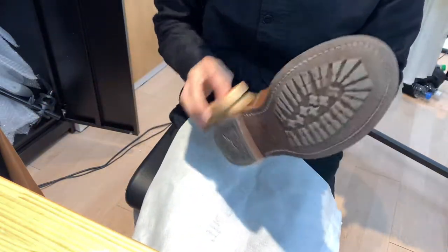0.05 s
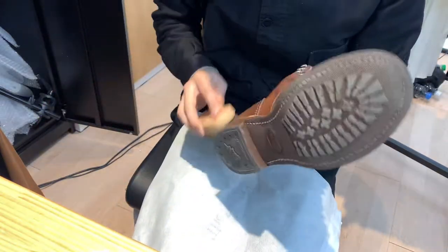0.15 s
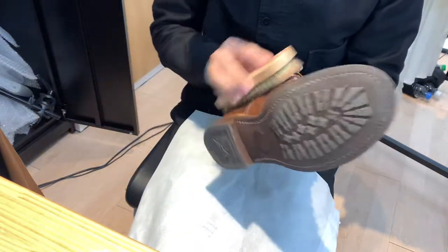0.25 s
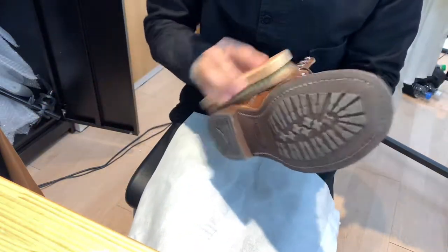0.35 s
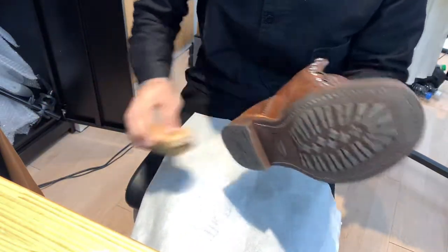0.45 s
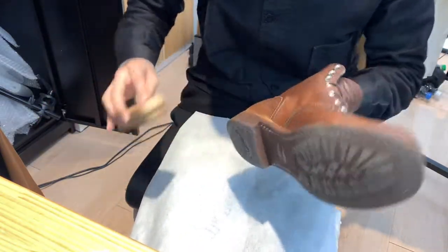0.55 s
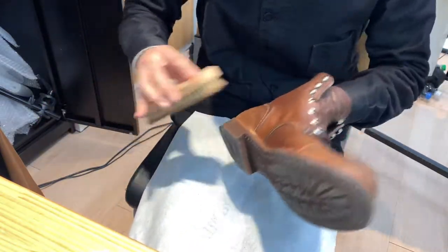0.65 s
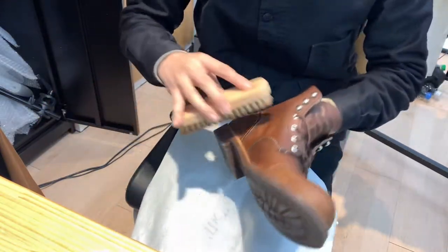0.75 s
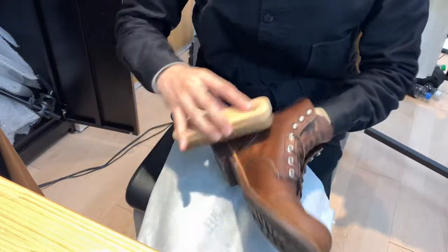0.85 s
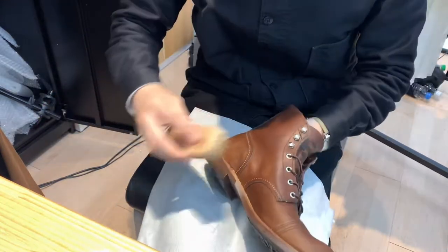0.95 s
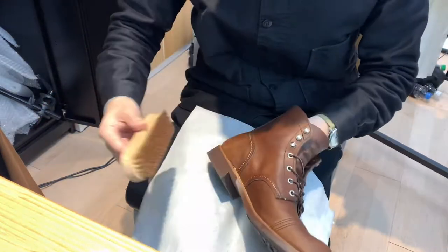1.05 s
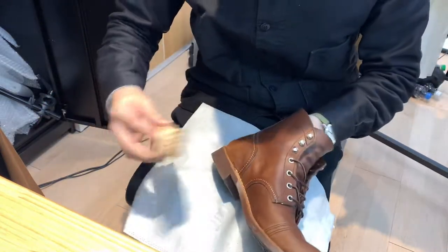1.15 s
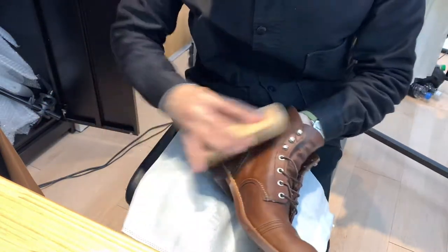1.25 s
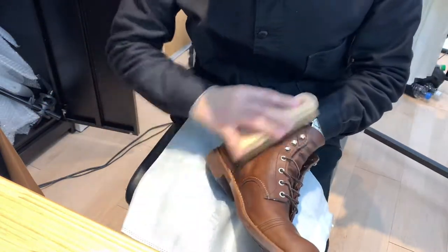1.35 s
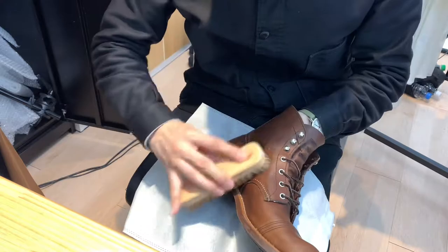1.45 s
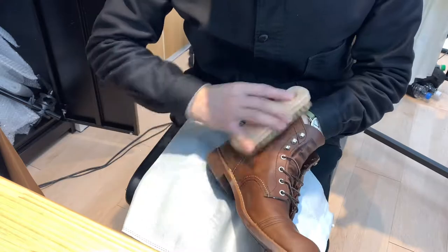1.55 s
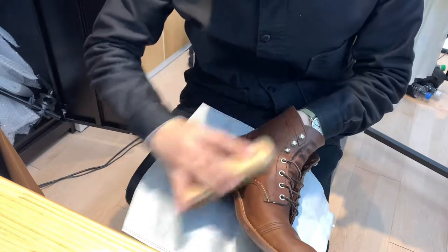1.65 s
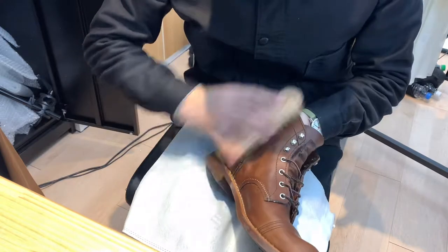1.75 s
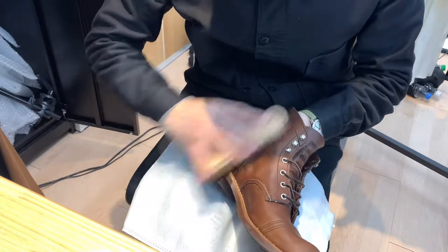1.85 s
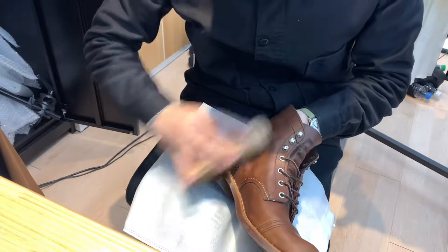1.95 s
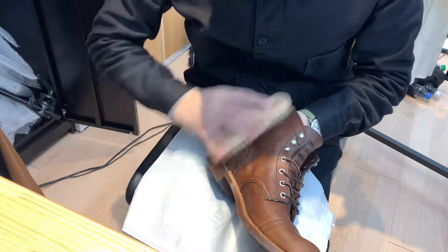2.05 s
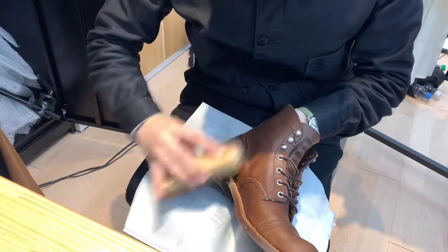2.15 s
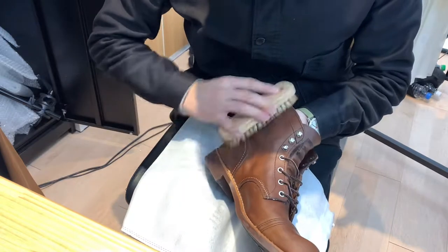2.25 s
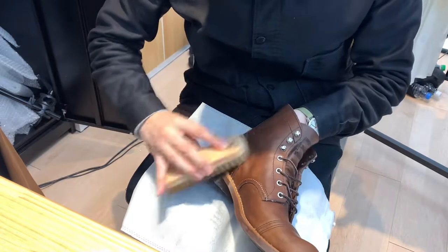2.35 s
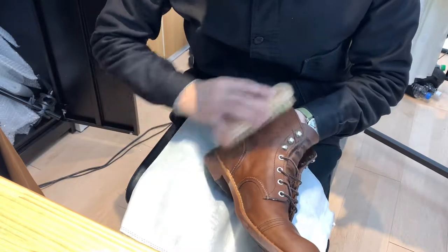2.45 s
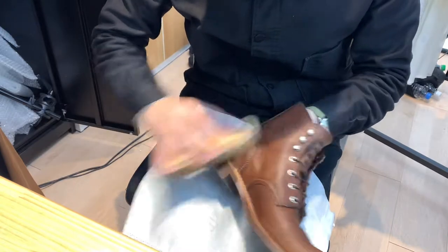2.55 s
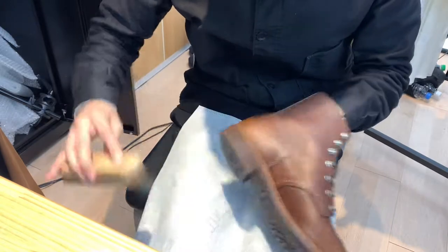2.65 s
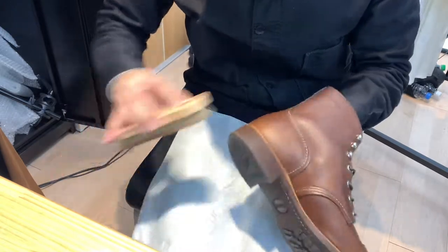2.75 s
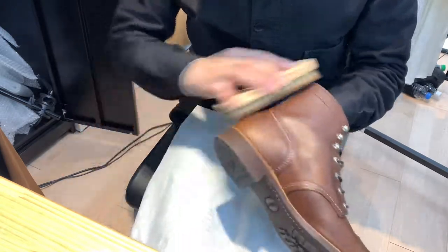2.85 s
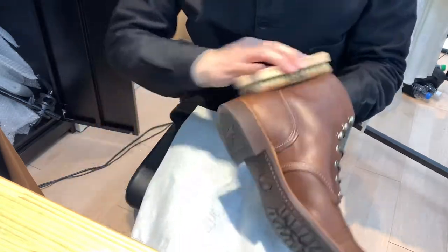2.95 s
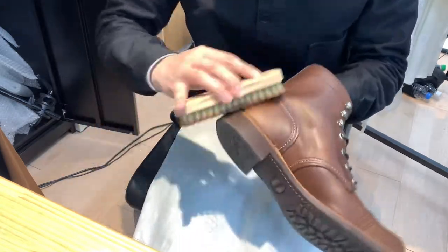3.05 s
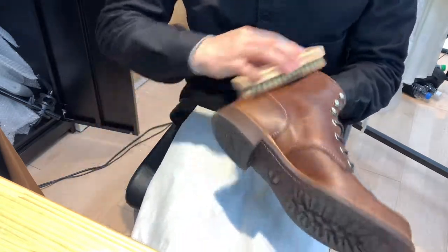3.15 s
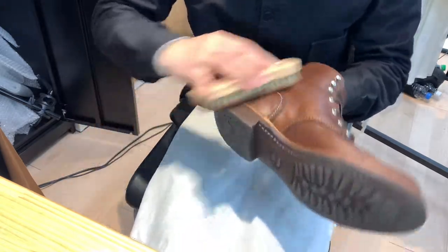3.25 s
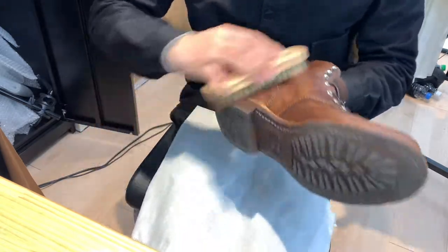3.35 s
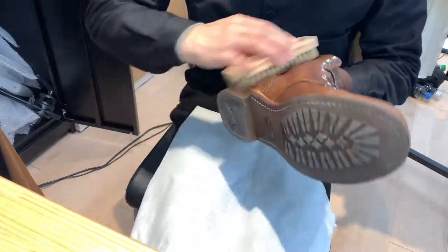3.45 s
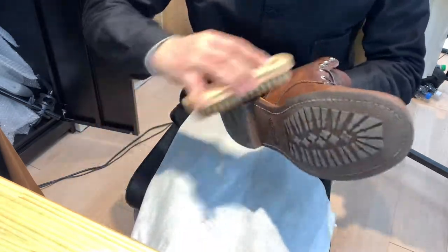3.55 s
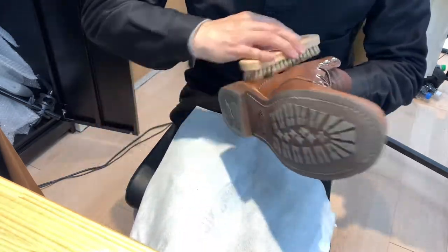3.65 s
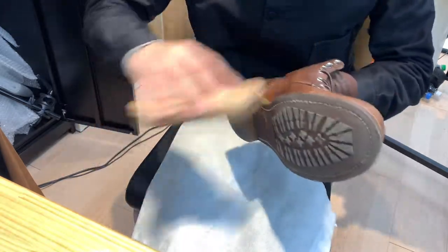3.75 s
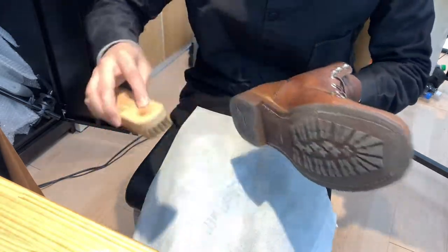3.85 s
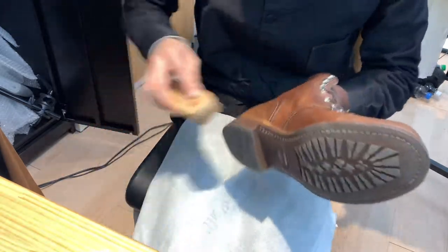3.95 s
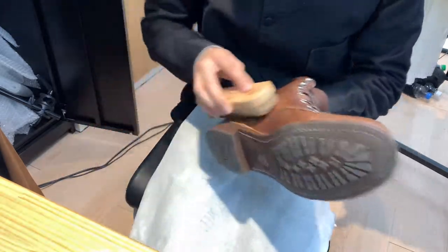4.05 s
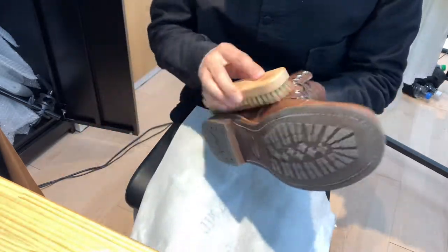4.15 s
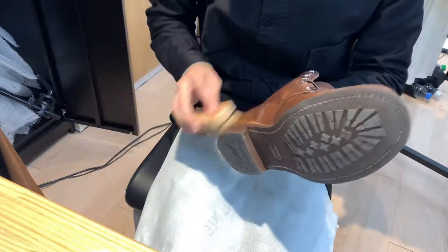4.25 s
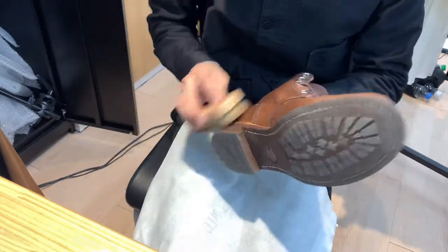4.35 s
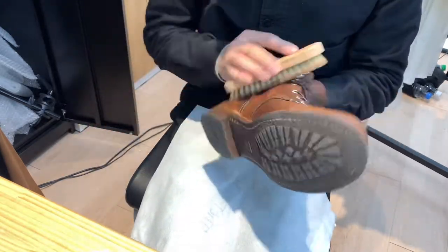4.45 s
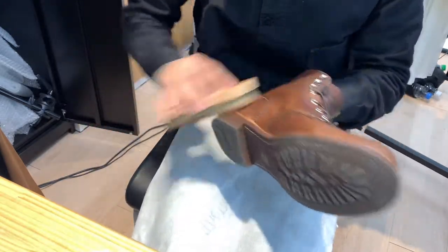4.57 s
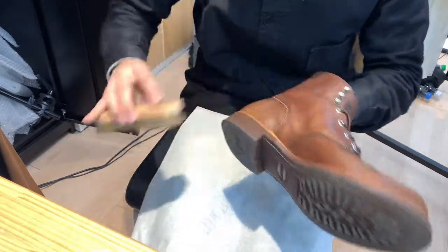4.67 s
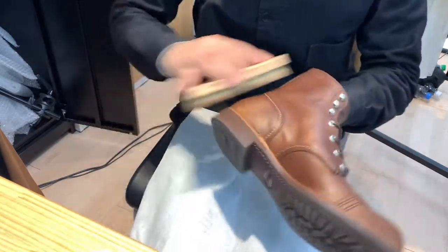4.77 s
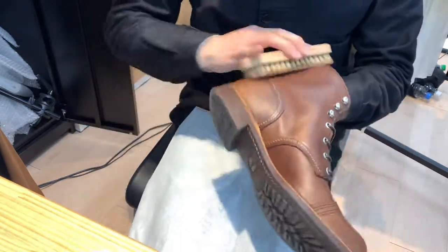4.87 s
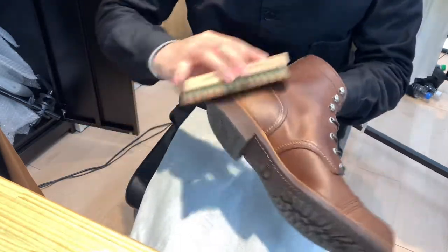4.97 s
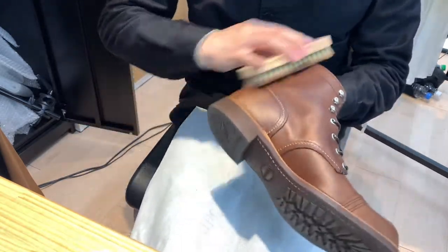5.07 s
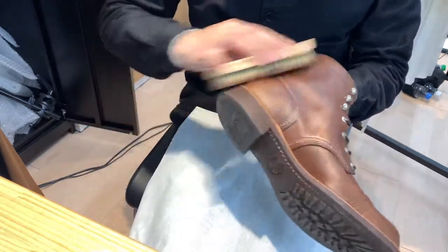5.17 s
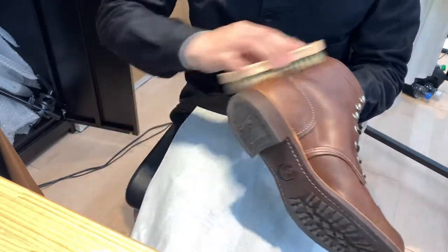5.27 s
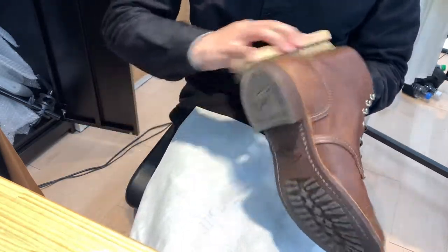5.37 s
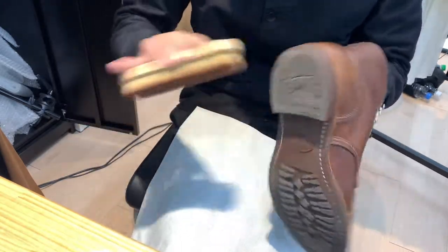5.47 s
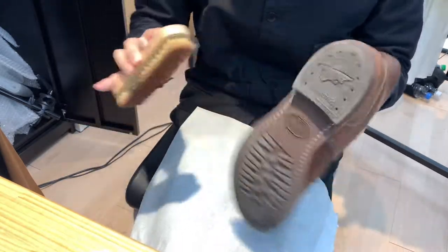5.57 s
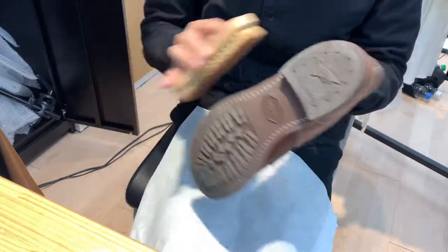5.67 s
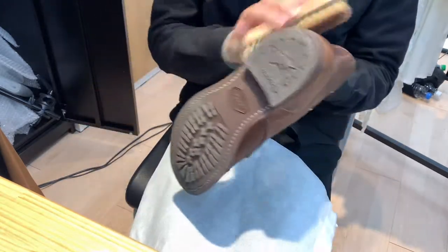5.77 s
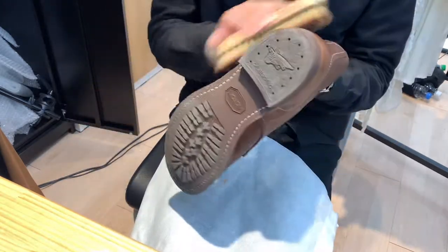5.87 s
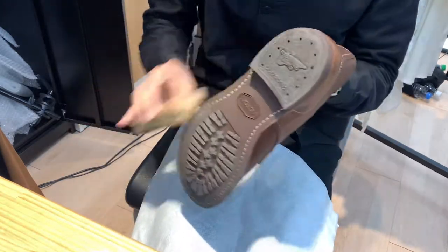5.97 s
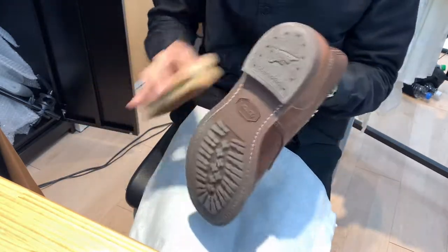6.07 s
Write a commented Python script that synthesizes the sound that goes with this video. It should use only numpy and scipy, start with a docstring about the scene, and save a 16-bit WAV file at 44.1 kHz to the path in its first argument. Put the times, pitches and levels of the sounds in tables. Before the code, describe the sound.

A bristle brush rasps quickly back and forth over a hollow leather boot in short runs, with soft thumps and pauses over a low ventilation hum.

```python
"""A wooden bristle brush sweeps quickly to and fro over a leather boot held on a lap, in runs with short pauses.
Random bristle flicks are coloured into hiss, rasp and drag; they also ring the hollow boot and the wooden block.
Bumps and sharp bites thump the boot with soft pulses, while short noise bursts slap, crunch and tick.
Clothes rustle in swells of random flicks as the boot is turned.
Behind, ventilation rushes as shaped noise and hums as unsteady sines in a small, dry room."""
import sys
import numpy as np
from scipy import signal
from scipy.fft import rfft, irfft, next_fast_len
from scipy.io import wavfile
from scipy.ndimage import map_coordinates

SR = 44100
rng = np.random.default_rng(int(sys.argv[2]) if len(sys.argv) > 2 else 0)


def wrap_up_sound(samples):
    """Save the sound to the file named by the first command line argument, as 16-bit audio."""
    columns = np.atleast_2d(samples).T
    # keep every value between -1 and 1, then stretch to whole-number steps
    tamed = np.clip(columns, -1, 1)
    steps = np.round(tamed * 32767).astype(np.int16)
    wavfile.write(sys.argv[1], SR, steps)


N = 269451
T = np.arange(N) / SR  # time in seconds

# The brush lands or turns back; each stroke lasts until the next turn or lift.
# Each row: start in seconds, hiss level in dB, pressure on the boot in dB.
STROKES = [(-.05, -44.5, -7.5), (0.116, -57.5, -10.5), (0.19, -48.5, 0.5), (0.288, -42, -2.5),
           (1.251, -50, 4.5), (1.325, -43, 3), (1.449, -44, 3.5), (1.554, -41.5, 2), (1.675, -42.5, 5.5),
           (1.78, -41, 4), (1.911, -43.5, 8.5), (2.009, -42, 3.5), (2.132, -43, 2.5), (2.239, -42.5, 0),
           (2.357, -42.5, 5.5), (2.461, -42, 2), (2.835, -53.5, -9), (2.901, -46, -6), (3.05, -45, -7),
           (3.165, -43.5, -3.5), (3.289, -42, 1), (3.403, -41.5, -2.5), (3.521, -42, 4), (3.621, -41, 3.5),
           (4.003, -47, -1), (4.117, -44, -6), (4.353, -45, 0), (4.44, -43, -4.5), (4.766, -47.5, -2),
           (4.837, -45.5, -7.5), (4.979, -48, -15.5), (5.089, -44, -2.5), (5.204, -44.5, -5),
           (5.298, -45.5, -7.5), (5.705, -53, -4.5), (5.819, -48.5, 2), (5.884, -43.5, -5),
           (6.083, -44.5, 5)]


def brushing():
    """Bristles bite first, shaking boot and block, then skim and hiss at full speed."""
    _, hiss_db, pressure_db = np.transpose(STROKES)
    speed = sweep(np.zeros(len(STROKES)), fastest=.46, power=1.0)
    rate = 2500 + 14000 * speed  # faster travel frees more bristles (flicks a second)
    tufts = amp(0.84 * wobble(70) + 0.23 * wobble(400))  # tufts catch and let go together
    on_leather = bristle_hiss(rate, hiss_db) + bristle_rasp(rate, hiss_db)
    on_leather = on_leather + block_ring(rate, hiss_db) + leather_drag(rate, hiss_db, pressure_db)
    # the boot's second field is weaker, so the drumming sits closer to the centre
    return tufts * on_leather + boot_drumming(rate, pressure_db) * amp([[0], [-3]])


# Bright spectrum of skimming bristles. Each row: frequency in Hz, density in dB per Hz.
HISS = [(2500, -15), (4500, -5.5), (6300, -5), (7800, 1), (10200, 1.5), (11500, 1.5), (13300, -0.5),
        (14500, -1), (15700, -11)]


def bristle_hiss(rate, hiss_db):
    """Bristles skim the leather: dense flicks with a bright colour, loudest at full speed."""
    texture = patchy(coloured(flicks(rate), HISS), depth_db=0.55, width_hz=630, seconds=0.067)
    return texture * sweep(hiss_db, fastest=0.44, power=1.27)


# Mid-heavy spectrum of biting bristles. Each row: frequency in Hz, density in dB per Hz.
RASP = [(700, -51), (1300, -6.5), (1900, -4), (3200, 4), (4500, -2.5), (6000, -6), (9000, -6.5)]


def bristle_rasp(rate, hiss_db):
    """Gripped bristles snap free: sparser flicks, louder where the leather grips."""
    texture = patchy(coloured(flicks(rate * .3), RASP), depth_db=3.0, width_hz=378, seconds=0.055)
    return texture * sweep(hiss_db, fastest=0.35, power=1.3) * amp(grip(T) - 2.5)


# Resonances of the wooden brush block. Each row: centre in Hz, width in Hz, level in dB.
BLOCK = [(1865, 400, -6.5), (2234, 99, 5.5), (2810, 320, -25)]
BLOCK_DB, BLOCK_PER_HISS = -43, 0.29  # the block rings almost alike in every stroke (dB, dB per dB)


def block_ring(rate, hiss_db):
    """Bristle flicks ring the wooden block, mostly early in each stroke."""
    ring = unit(rung(flicks(rate * .2), BLOCK)) * amp(2.5 * wobble(14))
    return ring * sweep(BLOCK_DB + BLOCK_PER_HISS * hiss_db, fastest=0.25, power=0.93)


# Dull spectrum of bristles dragging on leather. Each row: frequency in Hz, density in dB per Hz.
DRAG = [(200, -45), (420, 0), (700, 1), (1050, -3.5), (1500, -5), (2300, -3.5), (5000, -22.5)]
# offset in dB, then growth with pressure and with rasp in dB per dB
DRAG_DB, DRAG_PER_PRESSURE, DRAG_PER_RASP = -26, 0.32, 0.57


def leather_drag(rate, hiss_db, pressure_db):
    """Pressed bristles drag the leather: dull flicks that grow with pressure and rasp."""
    texture = patchy(coloured(flicks(rate * .12), DRAG), depth_db=3.0, width_hz=242, seconds=.05)
    level_db = DRAG_PER_PRESSURE * pressure_db + DRAG_PER_RASP * hiss_db
    return texture * sweep(level_db, fastest=0.27, power=0.83) * amp(DRAG_DB + DRAG_PER_RASP * grip(T))


# Resonances of the hollow boot. Each row: centre in Hz, width in Hz, level in dB.
BOOT = [(140, 12, -6), (167, 18, -7), (246.5, 28.4, 0.5), (287.5, 22.4, -6.5), (323, 50, -11.5),
        (423, 42, -10), (620, 94, -9), (795, 120, -6)]
BOOT_DB = -41.5  # drumming of the boot at pressure 0 dB


def boot_drumming(rate, pressure_db):
    """Bristle pushes drum the boot; soft leather passes only slow ones to the air inside."""
    soft_leather = [(60, -34), (200, 5.5), (450, -3.5), (1200, -29), (4000, -46)]  # (Hz, dB)
    pushes = coloured(flicks(rate * .1), soft_leather)
    drumming = patchy(rung(pushes, BOOT), depth_db=2.0, width_hz=210, seconds=0.056)
    return drumming * sweep(BOOT_DB + pressure_db, fastest=0.33, power=1.4)


# How the leather under the brush grips the bristles. Each row: time in seconds, rasp over hiss in dB.
GRIP = [(0, -7), (.4, -8.5), (1.28, 3), (1.8, 0), (2.5, -5), (3.1, 0.5), (3.22, -9), (4.4, -3), (4.55, -16),
        (4.85, -7), (5.04, 7), (5.14, -5), (5.25, 1), (5.37, -9), (5.75, -7.5)]


def grip(s):
    """Grip of the leather in dB at the times s."""
    return np.interp(s, *np.transpose(GRIP))


# The brush leaves the leather. Each entry: time in seconds.
LIFTS = [0.433, 2.583, 3.761, 4.27, 4.6, 5.426, 5.964, 6.17]
TRAIL_S = .007  # bent bristles trail on after each turn or lift
LIFT_LATE = 0.046  # it leaves at speed, so the last stroke peaks later (share of the stroke)


def sweep(levels_db, fastest, power):
    """One swell for each stroke, from its start to the next turn or lift."""
    starts = np.transpose(STROKES)[0]
    stops = np.concatenate([starts, LIFTS])
    out = np.zeros(N)
    for start, db in zip(starts, levels_db):
        stop = stops[stops > start].min()
        peak = fastest + LIFT_LATE * (stop in LIFTS)
        out += amp(db) * swell(start, stop + TRAIL_S, peak, power)
    return out


def swell(start, end, fastest, power):
    """A movement speeds up from rest and stops again; fastest is its peak, 0-1 of the way."""
    travel = np.clip((T - start) / (end - start), 0, 1)
    on = (travel > 0) & (travel < 1)
    skew = np.log(.5) / np.log(np.clip(fastest, .1, .9))  # moves the middle of the sine arch
    out = np.zeros(N)
    out[on] = np.sin(np.pi * travel[on] ** skew) ** power
    return out


def flicks(rate):
    """Bristles snapping free: random impulses, rate a second, of mean power 1."""
    chance = np.clip(rate / SR, 1e-4, 1)
    return noise() * (rng.random((2, N)) < chance) / np.sqrt(chance)


def patchy(x, depth_db, width_hz, seconds):
    """The colour shifts at random, as bristles cross seams, folds and curves; rms 1."""
    z = signal.stft(x, nperseg=256)[2]
    bins, frames = np.indices(z.shape[1:])
    across = bins * SR / 256 / max(width_hz, 100)
    along_time = frames * 128 / SR / max(seconds, .01)
    field = map_coordinates(rng.standard_normal((256, 640)), [across, along_time])
    return unit(signal.istft(z * amp(depth_db * field), nperseg=256)[1][:, :N])


# The bristle tips just touch the boot. Each row: start in seconds, end in seconds, hiss level in dB.
GRAZES = [(0.132, 0.19, -49.5), (1.012, 1.108, -66), (3.972, 4.028, -57), (4.303, 4.351, -46)]


def grazes():
    """The bristle tips alone swish, too lightly to shake the boot."""
    touch = sum(amp(db) * swell(start, end, fastest=0.38, power=1.6) for start, end, db in GRAZES)
    return touch * (coloured(flicks(9000), HISS) + amp(-11) * coloured(flicks(4100), RASP))


# wooden tick; soft, grippy leather muffles it (dB, dB per dB, dB per dB)
TICK_DB, TICK_PER_SLAP, TICK_PER_GRIP = -19.5, 0.85, 1.4
# Bumps of brush or hand on the boot, and sharp bites as the bristles start to drag.
# Each row: time in seconds, thump strength in dB before a common lift, leather slap level in dB.
KNOCKS = [(.226, -37.5, -42), (.926, -36, -54.5), (1.258, -20, -35.5), (1.458, -60, -37),
          (1.683, -53, -37.5), (1.794, -37.5, -45), (1.93, -28, -36), (2.155, -31, -39.5),
          (2.188, -34.5, -64), (2.261, -32.5, -47), (2.843, -39, -45), (3.546, -37, -48), (3.658, -43, -68),
          (4.362, -43, -61), (4.388, -41, -48), (4.401, -39, -50), (4.778, -39.5, -46.5), (5.228, -45, -38),
          (5.24, -37.5, -52), (5.43, -46.5, -76), (5.65, -44, -74), (5.719, -33, -39.5), (5.833, -37, -53),
          (5.914, -42, -47), (6.09, -37, -51.5)]


def knocks():
    """A soft push thumps the boot; bristles crunch, the leather slaps and the block ticks."""
    t = np.arange(SR // 4) / SR
    out = np.zeros((2, N + SR))
    for s, db, slap_db in KNOCKS:
        # a harder blow sinks in for longer and damps the boot more
        u = (t - .0055) / (0.00085 + 0.00026 * amp(db))
        push = (1 - u * u) * np.exp(-u * u / 2)
        thump = rung(push, BOOT, damping=0.85 + 8 * amp(db))
        # -60 * t / d fades by 60 dB in d seconds
        slap = coloured(noise(len(t)), DRAG) * amp(-60 * t / 0.082) * (1 - np.exp(-t / 0.00028))
        crunch = coloured(noise(len(t)), RASP) * amp(-27 - 60 * t / 0.024)
        tick_db = TICK_DB + TICK_PER_SLAP * slap_db - TICK_PER_GRIP * grip(s)
        tick = unit(rung(noise(len(t)), BLOCK)) * amp(tick_db - 60 * t / 0.13)
        first = round(s * SR)
        out[:, first:first + len(t)] += amp(slap_db) * (slap + crunch) + tick
        # the thump is centred
        out[0, first:first + len(t)] += amp(db + 5.5) * thump / np.abs(thump).max()
    return out[:, :N]


def early_echoes(x):
    """Each knock comes back from two nearby surfaces: two faint early echoes."""
    echoes = [(.0118, -17.5), (.0245, -18)]  # (delay s, dB)
    return filtered(x, lambda hz: 1 + sum(amp(db) * np.exp(-2j * np.pi * hz * delay)
                                          for delay, db in echoes))


# Spectrum of rubbing cloth. Each row: frequency in Hz, density in dB per Hz.
CLOTH = [(150, 6), (300, 22), (900, 1), (2800, -2.5), (5000, -10.5), (10000, -15), (15000, -23)]
# The boot is turned on the cloth. Each row: start in seconds, end in seconds, rustle level in dB.
HANDLING = [(.78, 1.23, -56.5), (5.42, 5.82, -61.5)]


def rustle():
    """Sleeve and lap cloth slide as the boot is turned: uneven swells of random flicks."""
    slide = sum(amp(db) * swell(start, end, fastest=0.48, power=0.92) for start, end, db in HANDLING)
    return slide * amp(2.24 * wobble(40)) * coloured(flicks(5000), CLOTH)


# Spectrum of the air rush. Each row: frequency in Hz, density in dB per Hz.
AIR = [(18, -34), (32, -12), (55, 2), (150, -4.5), (260, -4.5), (420, -13), (560, -12), (900, -18.5),
       (1500, -27.5), (2300, -29.5), (3500, -42.5), (5200, -45), (6500, -38), (15000, -49)]
# Motor tones. Each row: frequency in Hz, mean level in dB rms.
HUM = [(59, -67), (118.4, -58), (183, -63.5), (237, -61.5), (434, -71.5), (548, -76)]


def ventilation():
    """Low rush of air as shaped noise, with motor tones slightly unsteady in level and phase."""
    hum = np.zeros(N)
    for hz, db in HUM:
        tone = np.sqrt(2) * np.sin(2 * np.pi * hz * T + .5 * wobble(9))
        hum += amp(db + 2.0 * wobble(6.5)) * tone
    rush = amp(-54.5 + 0.99 * wobble(26.0)) * coloured(noise(), AIR)
    return rush + hum * np.array([[1], [0]])  # the hum is centred


def room(x, count=12):
    """The answer of the room changes as the hands move: random tails crossfade at even steps."""
    place = T / T[-1] * (count - 1)
    out = np.zeros((2, N))
    for k in range(count):
        share = np.clip(1 - abs(place - k), 0, 1)
        out += signal.fftconvolve(x * share, tail(), axes=1)[:, :N]
    return out


# Decay of the small room. Each row: frequency in Hz, time to fall by 60 dB in seconds.
ROOM = [(150, 0.39), (1000, 0.33), (5000, 0.27), (14000, 0.11)]


def tail():
    """One diffuse answer of the room: noise fading at each pitch's own pace, weak in the bass."""
    hz, t, z = signal.stft(noise(SR // 3), SR, nperseg=256)
    ring = signal.istft(z * amp(-60 * t / along(ROOM, hz)[:, None]), SR, nperseg=256)[1]
    ring = np.pad(ring / np.linalg.norm(ring[0]), ((0, 0), (SR // 200, 0)))  # arrives 5 ms late
    return filtered(ring, lambda f: amp(along([(250, -5.0), (700, 0.5)], f)))


# Likeness of the two microphone ports. Each row: frequency in Hz, left-right correlation from 0 to 1.
ALIKE = [(50, 0.92), (130, 0.8), (300, 0.85), (600, 0.17), (1200, 0.16), (2100, 0.77), (4500, 0.4),
         (5600, 0.067), (6700, 0.24), (7700, 0.95), (9400, 0.69), (10500, 0.98), (11550, .999), (12700, 1),
         (14000, 0.71), (15500, 0.88)]
# Phase between the ports. Each row: frequency in Hz, lead of the left port in radians.
LEAD = [(0, -.1), (1500, .15), (3100, .85), (4500, .4), (5200, .6), (6400, -1.2), (7100, -3.5),
        (9100, -6.25), (9650, -6.3), (11200, -9.3), (11750, -9.5), (13500, -12.4), (14400, -12.7),
        (15800, -15.6)]


def ports(pair):
    """Two unrelated fields blend into left and right; treble reaches the left port late."""
    def turn(hz):
        return np.arccos(np.clip(along(ALIKE, hz), 0, 1)) / 2

    def tilt(hz):
        phase = np.exp(1j * half * np.interp(hz, *np.transpose(LEAD)))
        return amp(half * along(balance, hz)) * phase

    # (Hz, left minus right dB)
    balance = [(500, 0.0), (2000, -0.5), (4000, -2.5), (5500, -3.5), (7300, 1.5), (9000, 0.0)]
    half = np.array([[.5], [-.5]])
    common, apart = filtered(pair, lambda hz: np.array([np.cos(turn(hz)), np.sin(turn(hz))]))
    return filtered(np.array([common + apart, common - apart]), tilt)


def amp(db):
    """Decibels to gain."""
    return 10 ** (np.asarray(db) / 20)


def unit(x):
    """Scale to rms 1."""
    return x / np.sqrt(np.mean(x ** 2) + 1e-20)


def along(points, hz):
    """Read a curve of (Hz, value) points on a log frequency axis."""
    f, v = np.transpose(points)
    return np.interp(np.log(hz + 1), np.log(f + 1), v)


def filtered(x, response):
    """Pass x through a complex response of frequency."""
    size = x.shape[-1]
    m = next_fast_len(size + SR // 4)
    return irfft(rfft(x, m) * response(np.fft.rfftfreq(m, 1 / SR)), m)[..., :size]


def coloured(x, spectrum):
    """Pass x through a smooth spectrum, at rms 1."""
    return unit(filtered(x, lambda hz: amp(along(spectrum, hz))))


def rung(x, modes, damping=1):
    """Pass x through the resonances of a body; damping widens them."""
    def response(f):
        total = 0
        for centre, width, db in modes:
            loss = 1j * f * width * damping
            total = total + amp(db) * loss / (centre * centre - f * f + loss)
        return total
    return filtered(x, response)


def wobble(rate):
    """A smooth random curve, rate knots a second."""
    return map_coordinates(rng.standard_normal(int(N * rate / SR) + 4), [T * rate])


def noise(size=N):
    """Two unrelated white noises."""
    return rng.standard_normal((2, size))


def scene():
    """Brush, boot and cloth close by, in the humming room."""
    strokes = brushing() + grazes() + rustle()
    bumps = early_echoes(knocks())
    answer = room(amp(-7.5) * strokes + amp(-7) * bumps)
    return ports(strokes + bumps + answer + ventilation())


def record(dry):
    """Keep nothing above the band limit of 15830 Hz."""
    return filtered(dry, lambda hz: hz < 15830)


dry = scene()
out = record(dry)
wrap_up_sound(out)
```